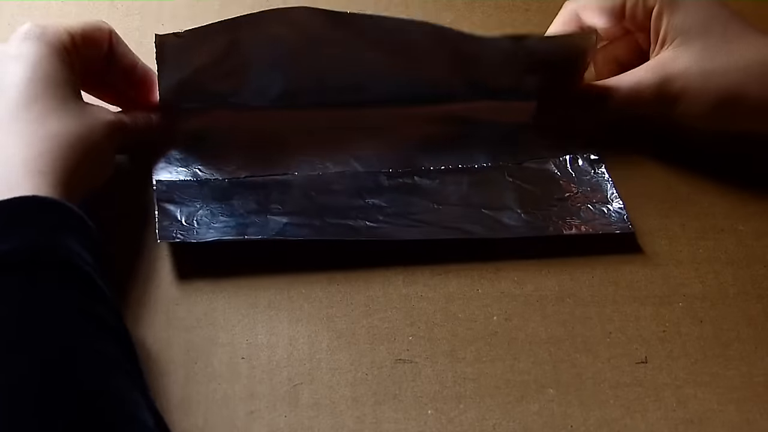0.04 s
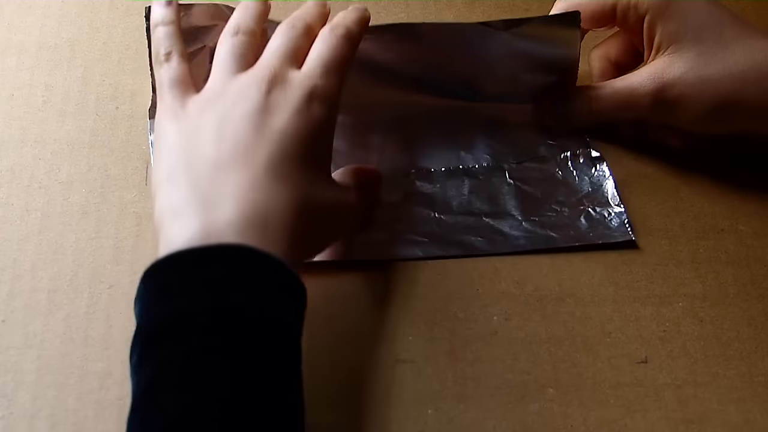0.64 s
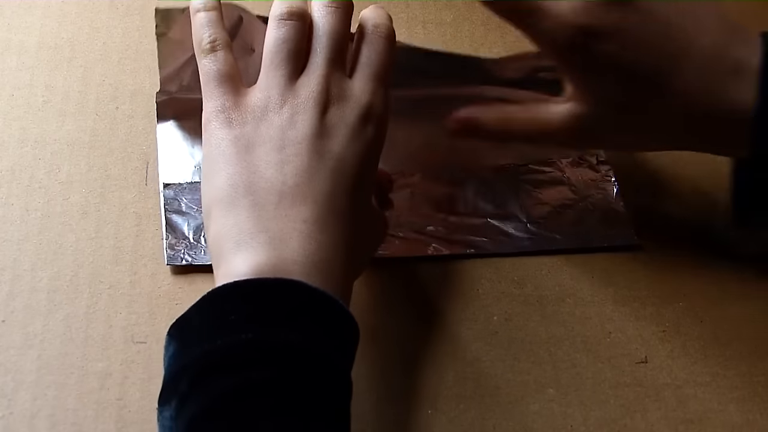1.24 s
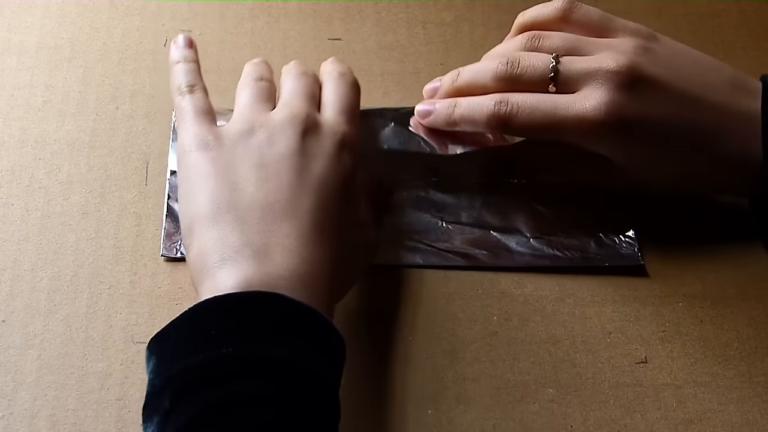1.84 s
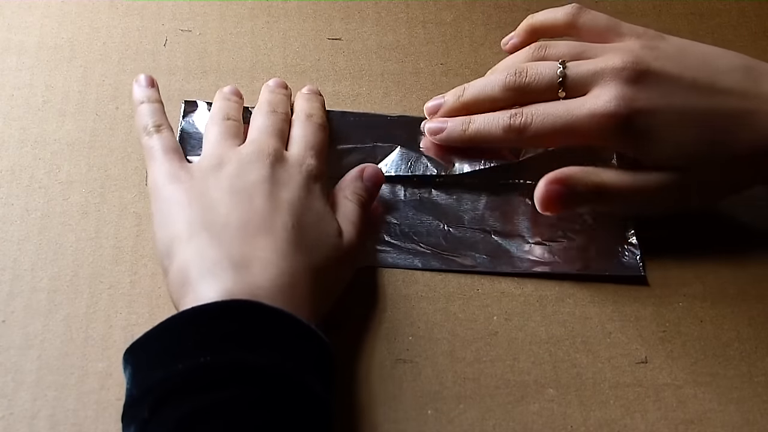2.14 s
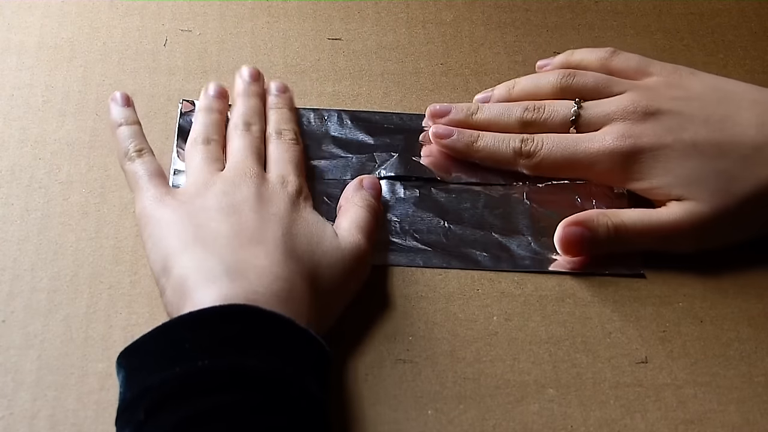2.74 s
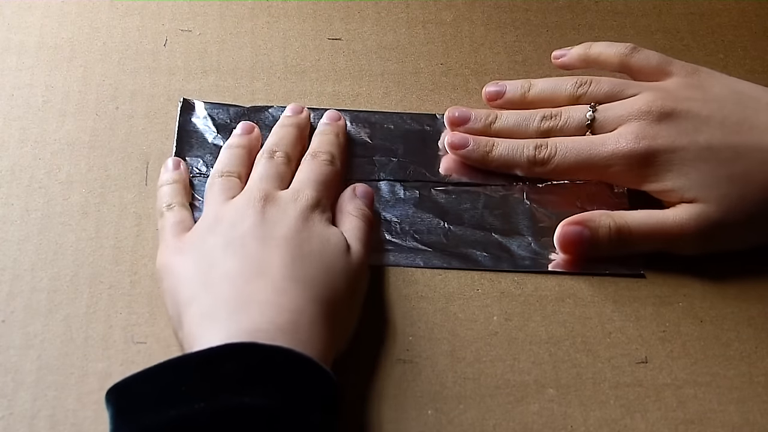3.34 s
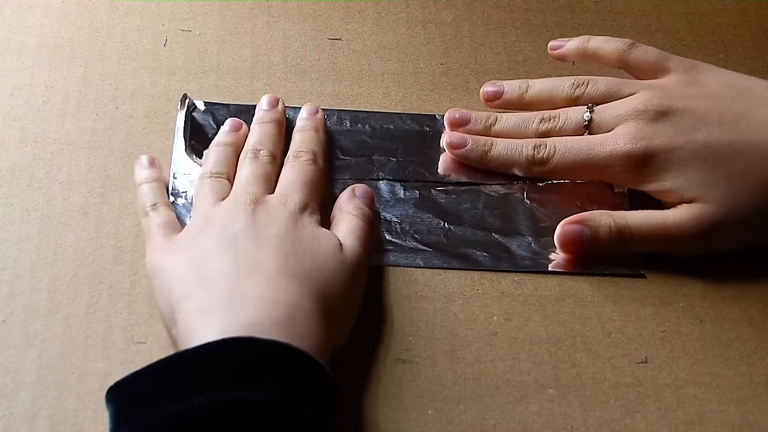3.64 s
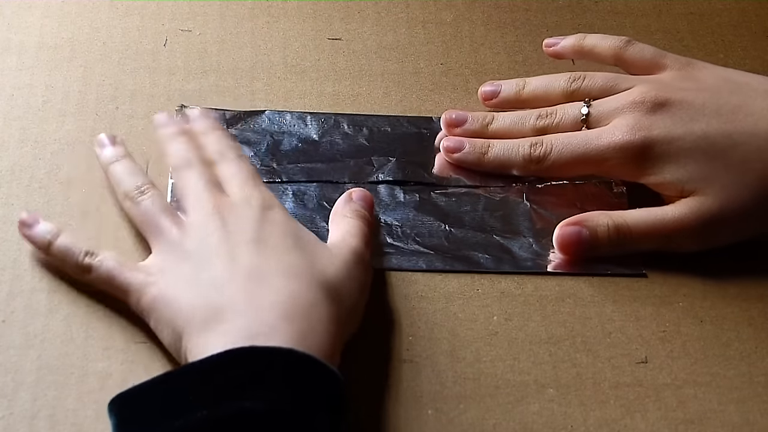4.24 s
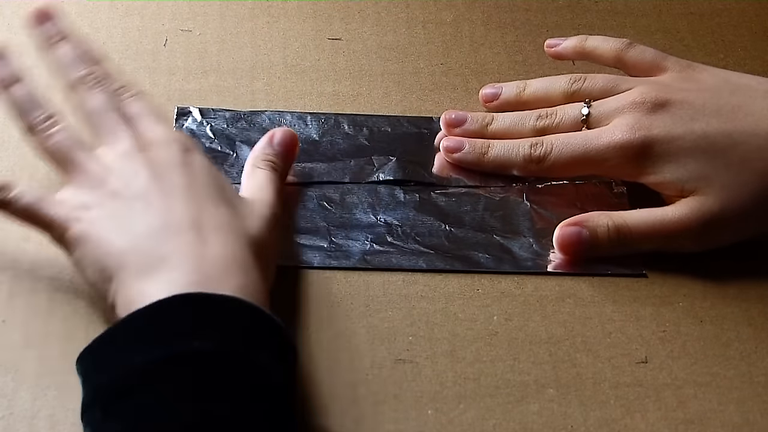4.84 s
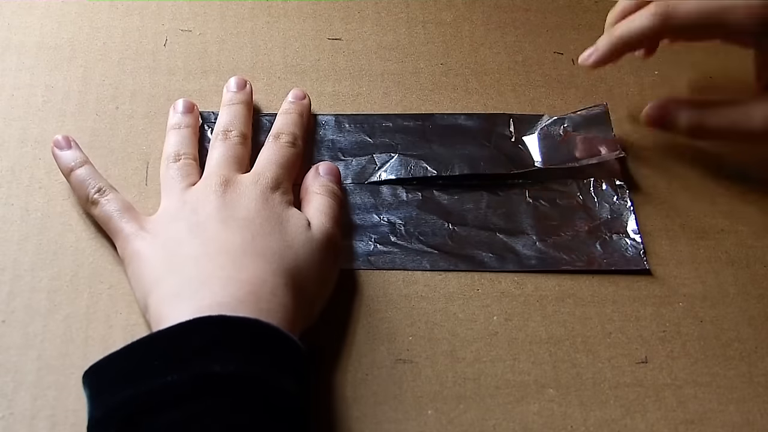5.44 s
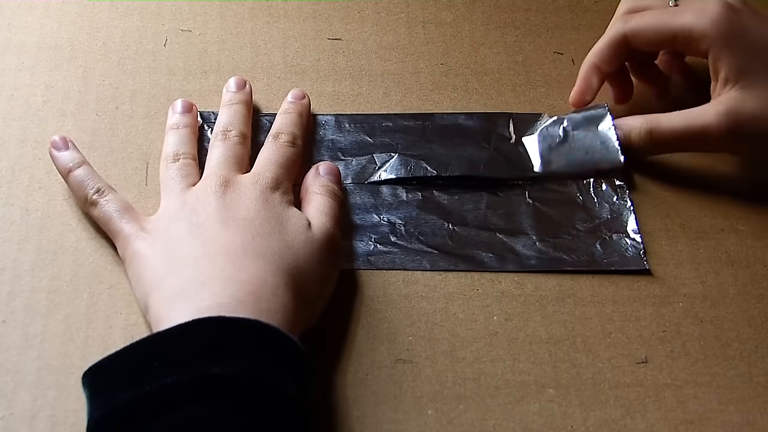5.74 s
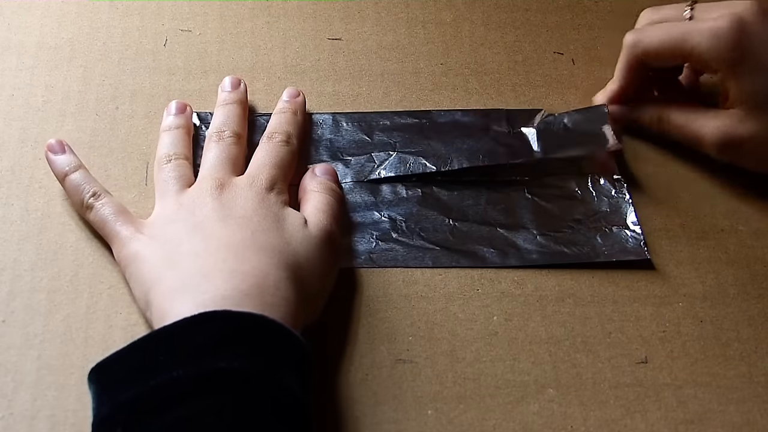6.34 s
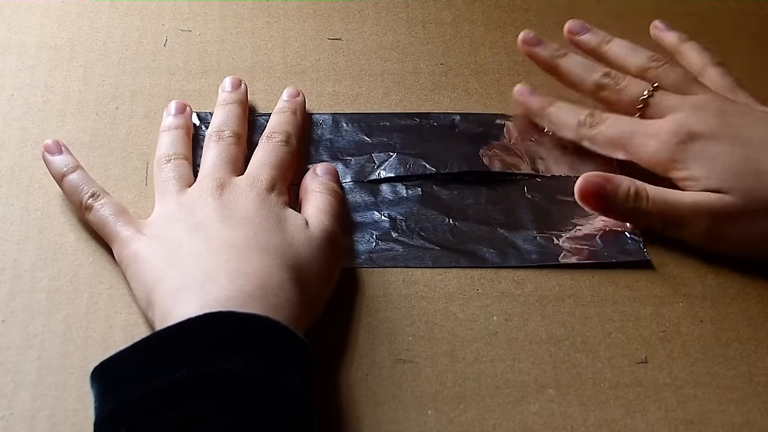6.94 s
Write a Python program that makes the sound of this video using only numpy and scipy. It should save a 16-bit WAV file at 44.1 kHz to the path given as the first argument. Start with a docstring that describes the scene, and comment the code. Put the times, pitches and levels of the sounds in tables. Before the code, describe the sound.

Hands fold a sheet of aluminium foil on a cardboard-covered table, close to the microphone in a small, quiet room. The foil first slides softly, with sharp, irregular snaps over a fine rustle. Fingers then smooth the crease with two faint scuffs and lighter ticks. After a lull comes the loudest snap and a soft bump of the cardboard, and the crackling carries on to the end.

```python
"""Hands fold aluminium foil on a cardboard-covered table, close by in a small, quiet room.
First the sheet slides over the board as it is folded. Its small flat patches (facets) buckle with
sharp snaps, and tiny wrinkles give way in a fine rustle. Between 2 and 3 seconds a fingertip scuffs
the crease twice and the sliding fades. Just after 5 seconds come the loudest snap and a soft thump
of the board. The creasing goes on to the end, and the room rings briefly after every snap."""
import sys
import numpy as np
from scipy import signal
from scipy.fft import rfft, irfft, next_fast_len
from scipy.io import wavfile
from scipy.ndimage import uniform_filter1d

SR = 44100
rng = np.random.default_rng(int(sys.argv[2]) if len(sys.argv) > 2 else 0)


def put_to_file(sound):
    """Save the sound as 16-bit audio at rate SR, in the file named by the first command-line argument."""
    columns = np.atleast_2d(sound).T  # one column per channel
    safe = np.clip(columns, -1, 1)
    whole_steps = np.round(safe * 32767)
    wavfile.write(sys.argv[1], SR, whole_steps.astype(np.int16))


N = 317079
TIME = np.arange(N) / SR

# The main snaps. Each row: start in seconds, level in dB, fade time in seconds, treble boost in dB,
# the facet's pitch in Hz, level sent into the room in dB compared with the direct sound.
MAIN_SNAPS = [(0.0325, -27.5, 0.0094, 7.5, 10700, -13), (0.0685, -24, 0.012, 0.5, 7720, -0.5),
              (0.1295, -27.5, 0.0097, 2.5, 5050, -14), (0.1346, -23.5, 0.0061, 4, 9500.0, -5),
              (0.2718, -40.0, 0.0078, -9, 1810.0, 3), (0.3215, -32.5, 0.0033, 5, 8230, 12),
              (0.3294, -24.5, 0.0073, 5.5, 10000, -1), (0.5975, -51.5, 0.0011, -24.5, 1087, 2),
              (0.6538, -38, 0.0031, -13, 3920, 1.5), (0.6918, -34.5, 0.0045, -5, 1040.0, 2),
              (0.7157, -26.5, 0.0057, 2, 8850.0, -9), (0.7287, -25.5, 0.0066, 1, 1176, -0.5),
              (0.7593, -37, 0.0055, -1, 1700.0, 1), (0.797, -25, 0.0073, 0, 9900, -3),
              (0.8254, -27, 0.0052, -6, 4100.0, -0.5), (0.8299, -22.5, 0.0069, -7, 1510, -3),
              (0.862, -32.5, 0.0042, -2, 1480.0, 0.5), (0.9672, -40, 0.0066, -13, 1489, 0),
              (1.1163, -49, 0.0067, -1, 910.0, 2.5), (1.2823, -42.5, 0.0025, 2, 4800, -2.5),
              (1.3781, -41.5, 0.0041, -11.5, 1640, 7), (1.5027, -30.5, 0.0059, -0.5, 6550, -0.5),
              (1.5614, -34, 0.0072, -8, 930.0, 0.5), (1.6152, -31.5, 0.0063, -7.5, 1470, -1),
              (1.6831, -26, 0.0064, 3.5, 6050.0, 2.5), (1.9353, -31.0, 0.003, 0.5, 1712, -4),
              (2.0091, -31.5, 0.0015, 4, 8000, 1.5), (2.1074, -34, 0.0031, -4, 5400, -3),
              (2.1404, -31.5, 0.0058, -6, 2420, 4.5), (2.1538, -32, 0.0056, 12, 8750, -6.5),
              (2.2175, -35, 0.0036, 1, 3840, -3), (2.2489, -37, 0.0034, -3, 3760, 6),
              (2.3216, -27, 0.0037, -3.5, 3840, -1.5), (2.3374, -29.5, 0.0025, -7.5, 2840, -2.5),
              (2.367, -30.5, 0.0017, -2, 9300, -4), (2.3978, -34.0, 0.003, -28, 4050.0, -11),
              (2.4055, -34.5, 0.0042, -16, 10000, -3), (2.4352, -34, 0.0032, -1, 3840.0, -12),
              (2.4862, -38, 0.0029, -1, 9300, 3), (2.5341, -23.5, 0.0065, -2.5, 8720, -3),
              (2.5523, -29, 0.0044, -3, 13850, -7.5), (2.6908, -27.0, 0.0018, -2, 4740, -5.5),
              (2.7114, -37, 0.0047, -8, 4000, 2), (2.7719, -38.5, 0.0012, -6, 1431.0, -5),
              (2.8091, -35, 0.002, 6, 9150, -4), (2.8574, -39.0, 0.0015, 6, 4200, -16),
              (2.8975, -33.0, 0.0066, 4, 9350.0, -6), (2.9646, -39.5, 0.0051, 0.5, 9670, -0.5),
              (3.0813, -28.5, 0.0059, 2, 9900.0, -13), (3.086, -29, 0.0042, -0.5, 9900, 1.5),
              (3.2348, -33, 0.0049, 5, 9570, -8), (3.3386, -46.5, 0.00078, -4.5, 3600.0, -10),
              (3.3971, -32.5, 0.0027, 8, 4040, -3), (3.4223, -40.5, 0.009, -3, 8900, 3),
              (3.5568, -42, 0.0021, -5, 9100.0, -1), (3.5847, -36.5, 0.0033, 0, 9030, 1.5),
              (3.644, -42.5, 0.0013, -2.5, 7500.0, -16), (3.6995, -42.0, 0.0025, -1, 8350, -6),
              (3.7255, -35.5, 0.0028, -0.5, 5730, 1), (3.8126, -40.5, 0.0037, 2, 11400.0, -15),
              (4.0928, -37, 0.0056, 1, 6040.0, -9), (4.109, -37.5, 0.00061, -1, 12500, 2),
              (4.3382, -38.5, 0.0021, 6.5, 9300.0, -3), (4.7085, -42, 0.0061, -6.5, 6660, 3.5),
              (4.7424, -38.5, 0.0017, -5.5, 3870.0, -1), (4.9695, -50.5, 0.0016, -13, 2080, -2),
              (5.0986, -20, 0.0041, 5, 10400, 0), (5.2183, -30, 0.0015, -2.5, 4940, -6),
              (5.2364, -31.5, 0.0077, -13, 4070.0, 2), (5.2501, -23.5, 0.0056, 8.5, 9200, -3),
              (5.7099, -42.0, 0.0069, -13, 14550, -2), (5.8167, -33, 0.0042, 1, 9900.0, -2),
              (5.8496, -33.5, 0.0044, 1, 7040, -5), (5.96, -29, 0.0049, -4, 11380, -16),
              (6.0813, -41, 0.0049, -4, 5570, 3), (6.1167, -35.5, 0.0016, -10, 8200, 3.5),
              (6.1561, -27.5, 0.007, 2.5, 9600.0, 0.5), (6.2631, -29.5, 0.0057, 2, 13300, -9),
              (6.2697, -29.5, 0.0089, 0, 11100.0, -2), (6.3085, -38.5, 0.0075, 4, 5050, -12),
              (6.3322, -37.5, 0.0053, 2, 9400, -3), (6.3671, -35.5, 0.0062, -2.5, 1390, 3.5),
              (6.4353, -40, 0.0011, -13.5, 1390, 8), (6.815, -27.5, 0.0075, 1.5, 2820, -2),
              (6.8247, -30.5, 0.0082, 1, 7550, -1), (6.8644, -34.0, 0.003, 0, 9650.0, -10),
              (6.8849, -29, 0.002, 4, 4750.0, -6), (6.9329, -31, 0.0049, 6.5, 10400, -1),
              (7.0179, -35.0, 0.0065, 4, 4700, 0), (7.0714, -31.5, 0.0056, 8, 9030, -3.5)]
# The foil's overall tone. Each row: frequency in Hz, level in dB.
FOIL_TONE = [(120, -43), (200, -31), (400, -16), (600, -9.5), (950, -4.5), (1270, -4), (2250, -4),
             (3400, -3.5), (4100, -2.5), (6000, -0.5), (9000, 4), (11000, 2), (13100, -2.5), (16000, -15)]
# Peaks and a dip in the folded sheet's tone. Each row: frequency in Hz, width in Hz, boost in dB.
SHEET_RESONANCES = [(1013, 71, -3.5), (1127, 18, 4), (1690, 600, 3), (2754, 84, 4), (4027, 270, 5),
                    (5010, 1100, 3)]
# A loose sheet sounds full, a flattened one thin. Each row: time in seconds, boost of the lows in dB.
SHEET_SLACK = [(0, -3), (0.35, 10.5), (0.63, -10.5), (0.74, 8.5), (0.85, 6), (1.5, 3), (2.15, 3),
               (2.35, -5.5), (2.65, -11), (3.1, -3.5), (3.3, -3.5), (3.6, -4), (4.3, -6), (4.8, -11),
               (5.15, 0), (5.8, -8), (6.25, 1), (6.8, -2), (7.0, -10.5)]
# The hands bend or smooth the sheet. Each row: time of the peak in seconds, rise time in seconds,
# fall time in seconds, level in dB, treble boost in dB.
HAND_STROKES = [(0.07, 0.1, 0.044, -39.5, -5), (0.19, 0.024, 0.04, -39, -3.5), (0.74, 0.031, 0.02, -45, -8),
                (0.826, 0.012, 0.037, -34.5, 1), (0.962, 0.021, 0.056, -47, -11),
                (1.39, 0.11, 0.11, -57, -16), (1.529, 0.038, 0.041, -45.5, -4),
                (1.679, 0.023, 0.012, -35, 1), (1.96, 0.11, 0.16, -44.5, -6.5), (2.17, 0.12, 0.19, -51, 7),
                (2.42, 0.11, 0.074, -45, -1.5), (2.54, 0.055, 0.09, -43.5, -7.5),
                (2.88, 0.2, 0.11, -51, -2), (3.1, 0.012, 0.023, -39, 4), (3.19, 0.096, 0.21, -54.5, 1),
                (3.72, 0.26, 0.066, -57, 1), (3.89, 0.062, 0.048, -42, 1.5), (4.11, 0.018, 0.035, -52, 10),
                (4.25, 0.057, 0.23, -61, -4), (4.376, 0.026, 0.03, -44, 2.5),
                (4.815, 0.04, 0.053, -43.5, -0.5), (5.05, 0.07, 0.099, -64, -1),
                (5.224, 0.019, 0.037, -34, 3), (5.64, 0.036, 0.033, -61, -6), (5.721, 0.024, 0.024, -49, 5),
                (5.839, 0.046, 0.081, -42, 0.5), (5.958, 0.026, 0.044, -40.5, 0.5),
                (6.28, 0.044, 0.012, -44, -1), (6.43, 0.037, 0.051, -48, 1), (6.798, 0.0098, 0.1, -42.5, 4),
                (7.07, 0.025, 0.029, -46.5, -1)]
# The sheet slides on the cardboard. Each row: time in seconds, level in dB, hollow note in Hz.
SLIDE_PATH = [(0, -61, 885), (0.199, -53.5, 901), (0.381, -65, 847), (0.68, -61.5, 861), (1.28, -74.5, 826),
              (1.55, -62, 849.5), (1.849, -63, 876), (2.15, -81, 925), (2.45, -69, 1037)]
# A fingertip on the crease. Each row: start in seconds, rise time in seconds, level in dB, pitch in Hz.
FINGER_SCUFFS = [(2.27, 0.015, -58, 999), (2.774, 0.015, -52.5, 1405)]
# The board bumps as a hand lifts off. Each row: start in seconds, level in dB, pitch in Hz.
BOARD_THUMPS = [(5.103, -52, 264), (5.128, -47, 285), (5.156, -58, 170)]
# How long the room rings. Each row: frequency in Hz, seconds to fade by 60 dB.
ECHO_FADE = [(200, 0.1), (800, 0.32), (2000, 0.34), (5500, 0.34), (10000, 0.28), (15000, 0.21)]
# The echoes' tone; the walls swallow the top treble. Each row: frequency in Hz, level in dB.
ECHO_TONE = [(300, -5), (4000, 2), (10000, 0.5), (15000, -4)]
# How wide the echoes sound. "Mid" is what both ears share, "side" is what sets them apart.
# Each row: frequency in Hz, side level compared with mid in dB.
ECHO_WIDTH = [(100, -5), (380, -15), (700, -20), (1000, -12), (1400, -29.5), (2500, -26), (4400, -24.5),
              (8000, -17.5), (15000, -4.5)]
# The hush of the still room. Each row: frequency in Hz, level in dB.
HUSH_TONE = [(12, 0), (20, -9), (91, -10), (182, -9.5), (290, -7), (388, -12), (542, -9), (698, -5),
             (825, -10.5), (1150, -5), (1570, -7.5), (2260, -18.5), (4060, -16), (10000, -18), (16000, -32)]
# How wide the hush sounds. Each row: frequency in Hz, side level compared with mid in dB.
HUSH_WIDTH = [(50, -13), (150, -10), (400, 2.5), (610, 2), (680, 11.5), (760, -0.5), (1300, -7),
              (4000, -7.5), (15000, -18)]


def snap(db, fade_s, lows_db, treble_db, ring_hz, crack_s=0.00016, ring_cycles=15, size=2048):
    """A facet flips with a quick run of buckles and a ping. Returns the direct sound and the room's feed."""
    t, hz = np.arange(size) / SR, frequencies(size)
    # a long run takes a moment to build; a short one is a bare tick
    rise = 1 - np.exp(-t / (0.22 * fade_s))
    fade = np.exp(-t / fade_s) + 0.45 * np.exp(-t / crack_s)
    surges = np.exp(0.37 * normalize(uniform_filter1d(rng.standard_normal(size), size=48)))
    crackle = rng.standard_normal(size) * surges * fade
    # an uneven facet rings at three close pitches; high ones fade sooner, fingers damp the low ones
    pitches_hz = ring_hz * np.exp(0.039 * rng.standard_normal((3, 1)))
    tones = np.sin(2 * np.pi * (pitches_hz * t + rng.random((3, 1)))).sum(axis=0)
    decay = np.exp(-t * (ring_hz / ring_cycles + 120)) * ring_hz / (ring_hz + 3000)
    drive = 0.61 * (fade_s / 0.0027) ** 0.14  # a longer run shakes the facet harder
    ping = drive * decay * tones
    # the flat facet aims its ping one way, so the room gets less of it
    bursts = rise * np.array([crackle + ping, crackle + 0.5 * ping])
    lows, _, treble = band_shares(hz)
    sounds = irfft(rfft(bursts) * ringing_filter(sheet_db(hz) + lows * lows_db + treble * treble_db))
    # db is the level the snap would have if it lasted 5 ms
    return gain(db) * sounds / np.sqrt(np.sum(sounds ** 2, axis=1, keepdims=True) / (0.005 * SR))


def snaps(rows, places=6):
    """Facets lie at several places and face different ways, so each feeds the room by its own amount."""
    direct, to_room = np.zeros(N), np.zeros((places, N))
    for k, (start_s, db, fade_s, treble_db, ring_hz, room_db) in enumerate(rows):
        near, spread = snap(db, fade_s, lows_db_at(start_s), treble_db, ring_hz)
        add(direct, start_s, near)
        add(to_room[k % places], start_s, gain(room_db) * spread)
    return direct, to_room


def small_snaps(level_db, treble_db, tries_per_s=28, fade_s=0.0012, ring_hz=7000, room_db=-9, slots=400):
    """Small facets flip at random, louder as the hands work harder. Returns rows like MAIN_SNAPS."""
    rows = []
    draws = rng.random((slots, 2))
    variations = np.clip(rng.standard_normal((slots, 3)), -2, 2)
    for (when, chance), (size, tint, pitch) in zip(draws, variations):
        i = int(when * N)
        db = min(level_db[i] + 6 + 3 * size, -40)
        if chance < tries_per_s * N / SR / slots and db > -54:  # skip the faintest
            rows.append((TIME[i], db, fade_s, treble_db[i] + 3 * tint, ring_hz * 2 ** (pitch / 2), room_db))
    return rows


def hand_effort(drop_db=8, roundness=1.25):
    """Each stroke of the hands swells and dies away. Returns level and treble boost over time, in dB."""
    power, weighted_treble = np.zeros(N), np.zeros(N)
    for peak_s, rise_s, fall_s, db, treble_db in HAND_STROKES:
        from_peak = np.maximum((peak_s - TIME) / rise_s, (TIME - peak_s) / fall_s)
        stroke = gain(db - drop_db * np.minimum(from_peak, 10) ** roundness) ** 2
        power += stroke
        weighted_treble += stroke * treble_db
    return 10 * np.log10(power), weighted_treble / power


def rustle(level_db, treble_db, per_s=1100, spread_db=5, ring_s=0.0033, skin_hiss=0.45):
    """Many tiny wrinkles give way, each a short burst, over the smooth hiss of skin on metal."""
    sizes = gain(spread_db * np.minimum(rng.exponential(size=N), 4))
    buckles = sizes * (rng.random(N) < per_s / SR)
    power = signal.lfilter([1], [1, -np.exp(-2 / (ring_s * SR))], buckles ** 2)
    grains = rng.standard_normal(N) * np.sqrt(power / power.mean() + skin_hiss ** 2)
    size = 2 * next_fast_len(N // 2 + 1)
    hz = frequencies(size)
    spectrum = rfft(grains, size) * ringing_filter(sheet_db(hz))
    bands = [irfft(spectrum * share)[:N] for share in band_shares(hz)]
    gains = gain(lows_db_at(TIME) + 2), 1, gain(treble_db)
    strength = np.sqrt(sum(g ** 2 * band.var() for g, band in zip(gains, bands)))
    return gain(level_db - 0.5) * sum(g * band for g, band in zip(gains, bands)) / strength


def sheet_db(hz):
    """The foil's overall tone with the sheet's resonances on top, in dB."""
    resonances = sum(db / (1 + (2 * (hz - f) / width) ** 2) for f, width, db in SHEET_RESONANCES)
    return look_up(FOIL_TONE, hz) + resonances


def lows_db_at(seconds):
    """The looser the sheet is at this time, the stronger its low sounds."""
    return np.interp(seconds, *np.transpose(SHEET_SLACK))


def band_shares(hz, lows_below_hz=1990, treble_above_hz=6050):
    """Split the sound into lows, middle and treble: the shares of large, medium and tiny facets."""
    lows = 1 / (1 + (hz / lows_below_hz) ** 4)
    treble = 1 - 1 / (1 + (hz / treble_above_hz) ** 4)
    return lows, 1 - lows - treble, treble


def slide(catch_db=4.5, release_s=0.074):
    """The sheet catches and slips, sounding the air pocket under it; the note rises as the fold flattens."""
    times, levels, pitches = np.transpose(SLIDE_PATH)
    db, hz = np.interp(TIME, times, levels), np.interp(TIME, times, pitches)
    release = np.exp(-np.maximum(TIME - times[-1], 0) / release_s)
    loudness = gain(db + catch_db * wander(10)) * release
    return loudness * rubbed_note(hz, core_hz=51, rough_hz=348.4, rough_db=-6.5)


def scuffs():
    """Skin drags on the crease for a moment: a brief, rough note."""
    out = np.zeros(N)
    for start_s, rise_s, db, hz in FINGER_SCUFFS:
        age = np.maximum(TIME - start_s, 0) / rise_s
        out += gain(db) * age * np.exp(1 - age) * rubbed_note(hz, core_hz=150, rough_hz=397, rough_db=-7)
    return out


def rubbed_note(hz, core_hz, rough_hz, rough_db):
    """Rubbing makes an unsteady note: a narrow band of noise inside a wider, rougher one."""
    note = np.exp(2j * np.pi * np.cumsum(hz * np.ones(N)) / SR)
    core, rough = (np.real((wander(width) + 1j * wander(width)) * note) for width in (core_hz, rough_hz))
    return core + gain(rough_db) * rough


def thumps(rise_s=0.01, width=0.61):
    """The cardboard springs back: dull, papery bumps so close that they blur into one."""
    out, t = np.zeros(N), np.arange(SR // 5) / SR
    swell = t / rise_s * np.exp(1 - t / rise_s)
    for start_s, db, hz in BOARD_THUMPS:
        tone = [(hz / np.exp(2 * width), -24), (hz, 0), (hz * np.exp(width), -20)]
        flutter = normalize(shape_tone(rng.standard_normal(len(t)), tone))
        add(out, start_s, gain(db) * swell * flutter)
    return out


def room_echoes(places, level_db=-2):
    """The room rings, with its own echoes for each place on the sheet. Returns mid and side."""
    mid = sum(signal.oaconvolve(sound, echo_tail())[:N] for sound in places)
    side = signal.oaconvolve(sum(places), echo_tail())[:N]
    return gain(level_db) * np.array([mid, shape_tone(side, ECHO_WIDTH)])


def echo_tail(build_s=0.00064, size=20000, bands=7):
    """The room's answer to one click: echoes build quickly and die soonest in the bass and top treble."""
    t, hz = np.arange(size) / SR, frequencies(size)
    noise = rfft(rng.standard_normal(size)) * gain(look_up(ECHO_TONE, hz))
    centres_hz = np.geomspace(ECHO_FADE[0][0], ECHO_FADE[-1][0], bands)
    tail = np.zeros(size)
    for centre_hz, weights in zip(centres_hz, np.eye(bands)):
        band = irfft(noise * np.interp(np.log(hz), np.log(centres_hz), weights))
        tail += band * gain(-60 * t / look_up(ECHO_FADE, centre_hz))
    tail *= np.sqrt(1 - np.exp(-t / build_s))
    return tail / np.sqrt(np.sum(tail ** 2))


def room_hush(level_db=-63):
    """The faint, steady noise of the still room. Returns mid and side."""
    mid, side = (normalize(shape_tone(rng.standard_normal(N), HUSH_TONE)) for _ in range(2))
    return gain(level_db) * np.array([mid, shape_tone(side, HUSH_WIDTH)])


def gain(db):
    """Turn decibels into a number to multiply by."""
    return 10 ** (np.asarray(db) / 20)


def normalize(x):
    """Scale a sound to an average power of 1."""
    return x / np.sqrt(np.mean(x ** 2))


def frequencies(size):
    """The frequencies in Hz that make up a sound of this many samples."""
    return np.maximum(np.fft.rfftfreq(size, 1 / SR), 1)


def look_up(points, hz):
    """Read between (Hz, value) points, with every octave equally wide."""
    point_hz, values = np.transpose(points)
    return np.interp(np.log(hz), np.log(point_hz), values)


def shape_tone(x, points):
    """Turn a sound's frequencies up or down along (Hz, dB) points."""
    size = next_fast_len(len(x))
    return irfft(rfft(x, size) * gain(look_up(points, frequencies(size))), size)[:len(x)]


def ringing_filter(db):
    """A filter with these levels that rings only after a hit, never before (minimum phase)."""
    cepstrum = irfft(np.log(gain(db)))
    half = len(cepstrum) // 2
    cepstrum[1:half] *= 2
    cepstrum[half + 1:] = 0
    return np.exp(rfft(cepstrum))


def wander(hz):
    """A random wobble, mostly slower than hz, with a typical size of 1."""
    return normalize(signal.sosfilt(signal.butter(2, hz, fs=SR, output="sos"), rng.standard_normal(N)))


def add(track, start_s, sound):
    """Mix a sound into a track at the given time."""
    start = max(int(start_s * SR), 0)
    part = track[start:start + len(sound)]
    part += sound[:len(part)]


def scene(handling_room_db=-1, balance_db=-0.12):
    """The foil lies straight ahead; only the room gives width. Returns left and right."""
    level_db, treble_db = hand_effort()
    handling = rustle(level_db, treble_db) + slide() + scuffs() + thumps()
    direct_snaps, snaps_to_room = snaps(MAIN_SNAPS + small_snaps(level_db, treble_db))
    mid, side = room_echoes([*snaps_to_room, gain(handling_room_db) * handling]) + room_hush()
    mid = mid + direct_snaps + handling
    return np.array([(mid + side) * gain(balance_db / 2), (mid - side) * gain(-balance_db / 2)])


def record(dry, top_hz=16100):
    """Cut away the very highest treble."""
    return signal.sosfilt(signal.ellip(10, 0.2, 80, top_hz, fs=SR, output="sos"), dry)


dry = scene()
out = record(dry)
put_to_file(out)
```